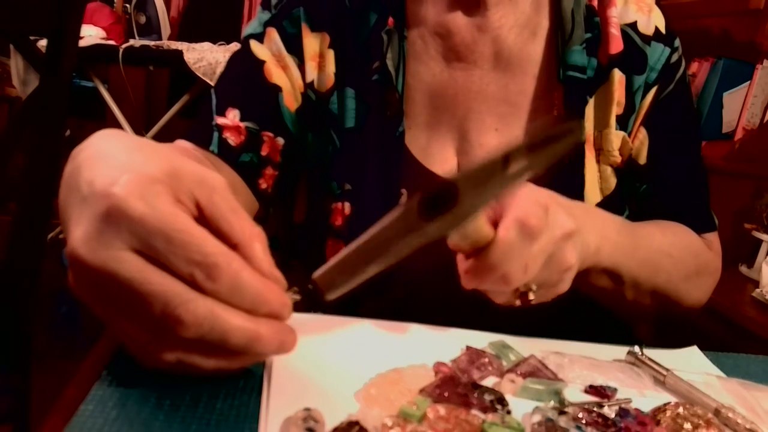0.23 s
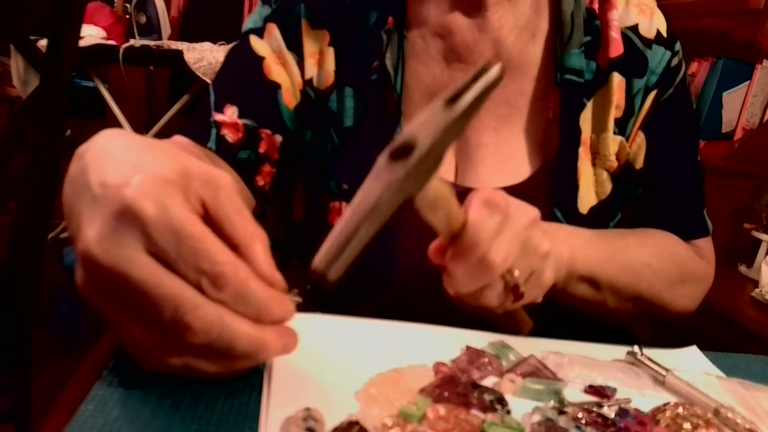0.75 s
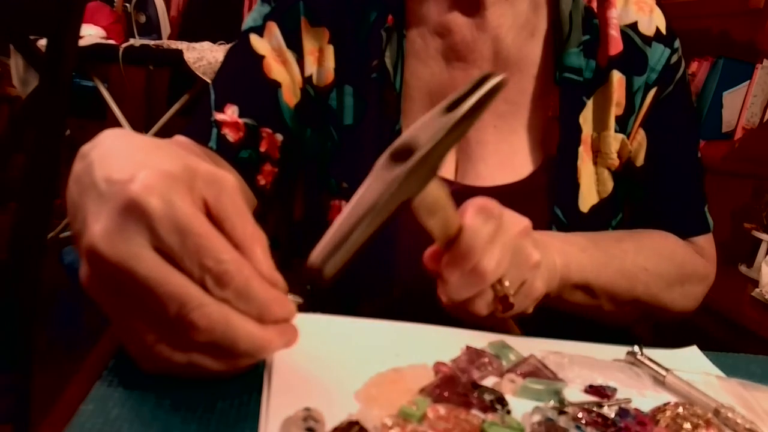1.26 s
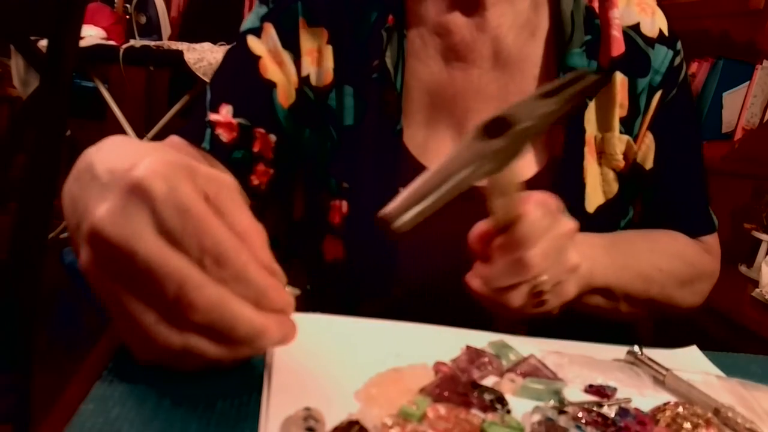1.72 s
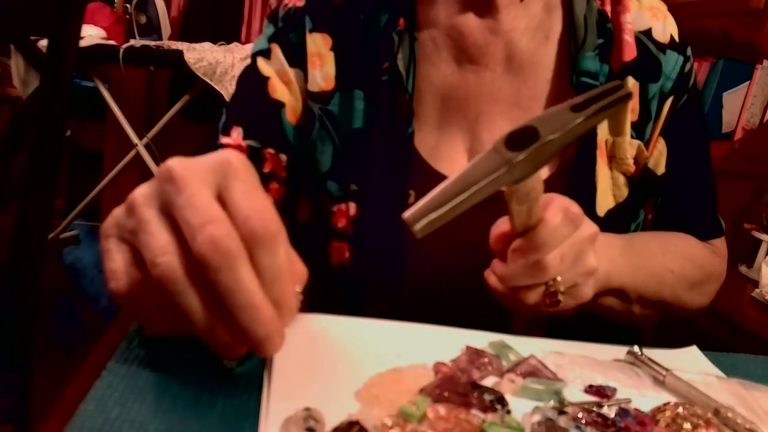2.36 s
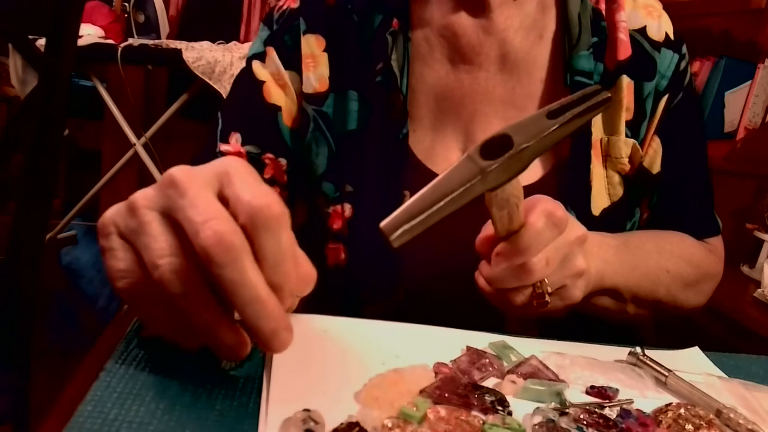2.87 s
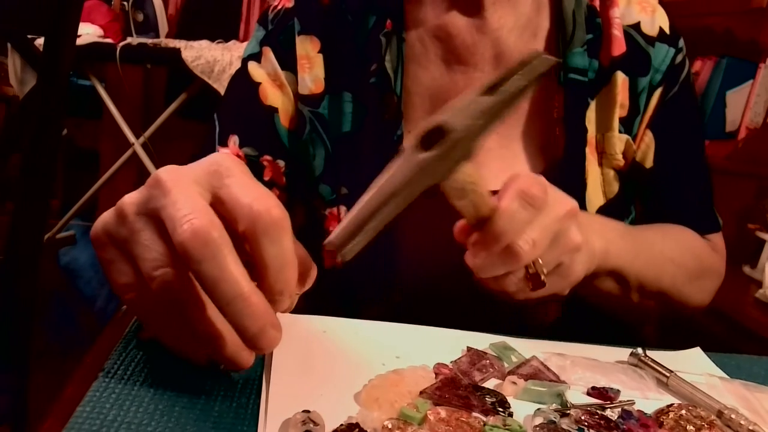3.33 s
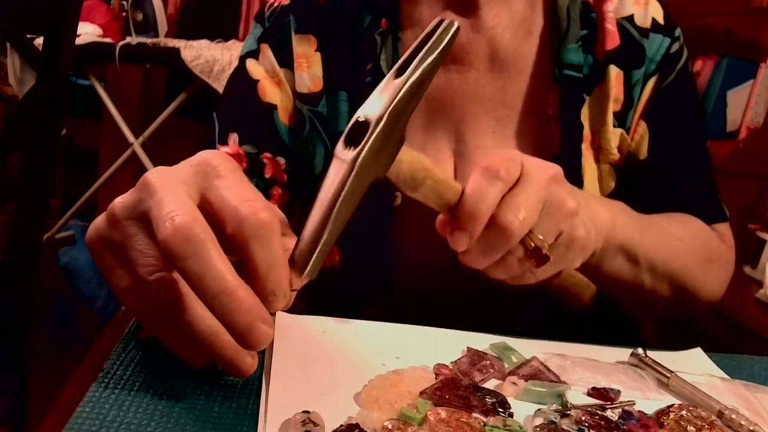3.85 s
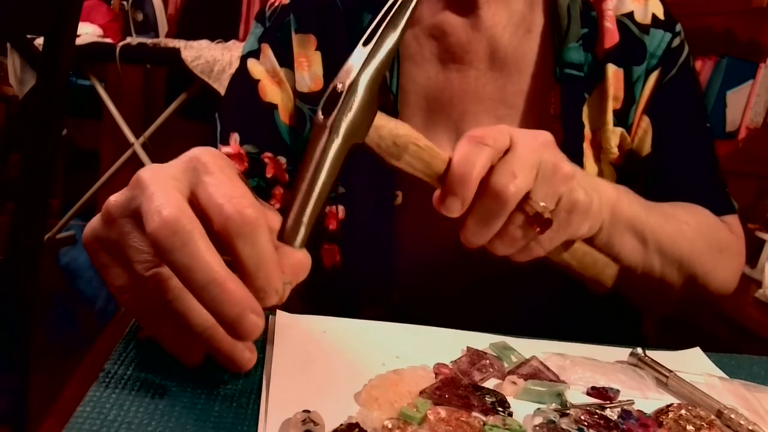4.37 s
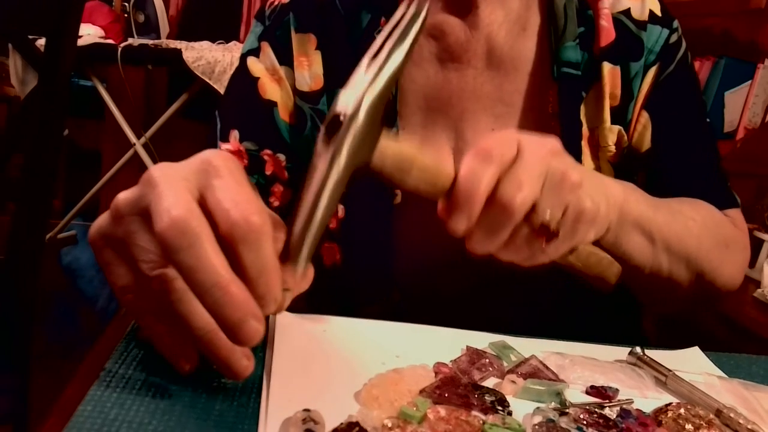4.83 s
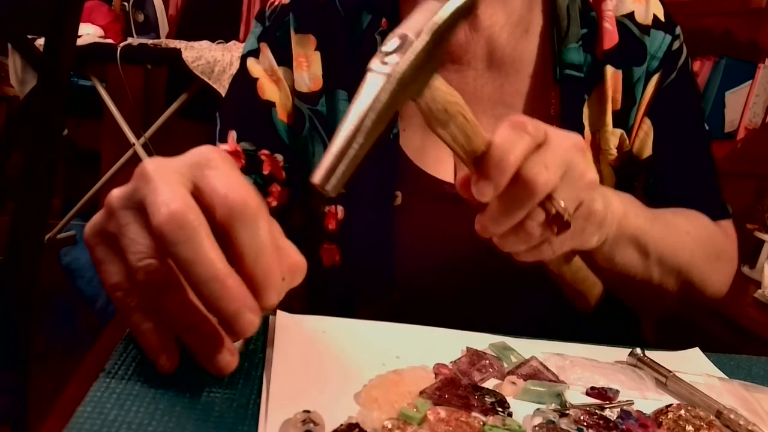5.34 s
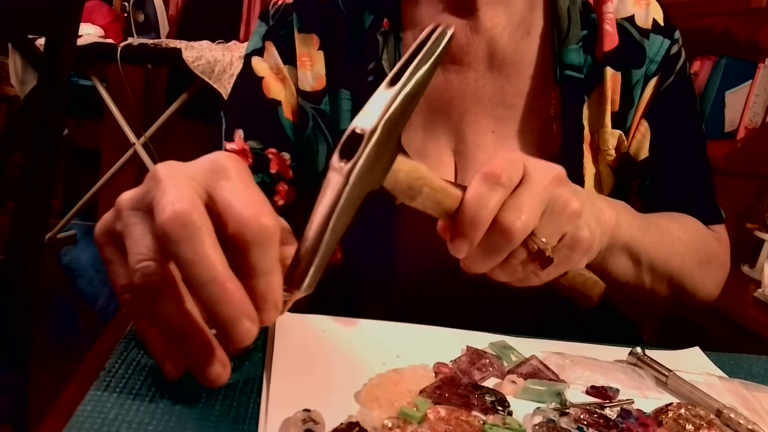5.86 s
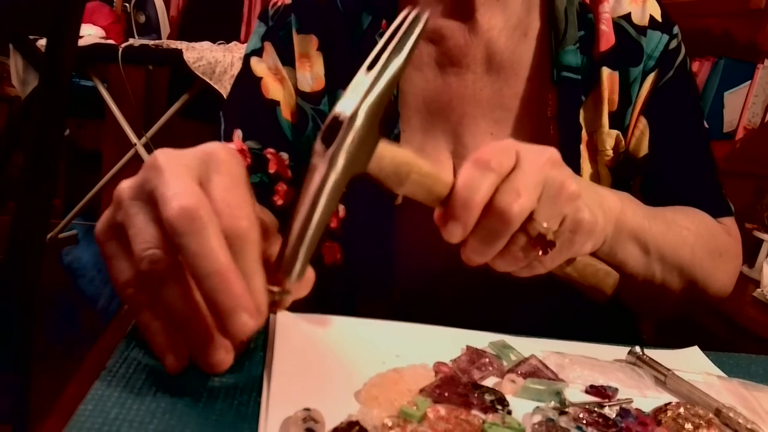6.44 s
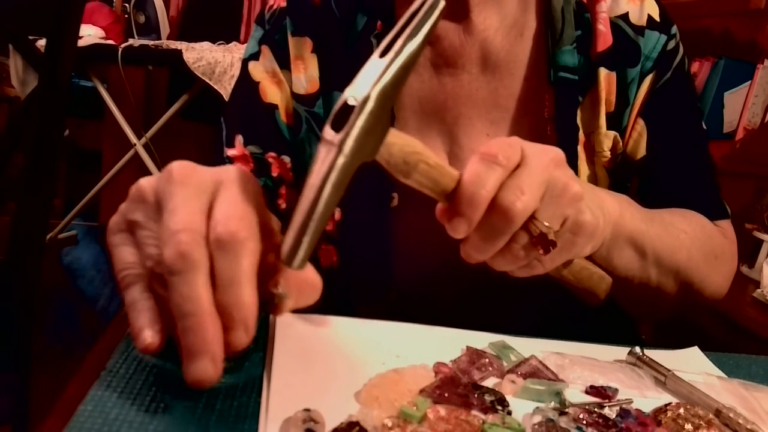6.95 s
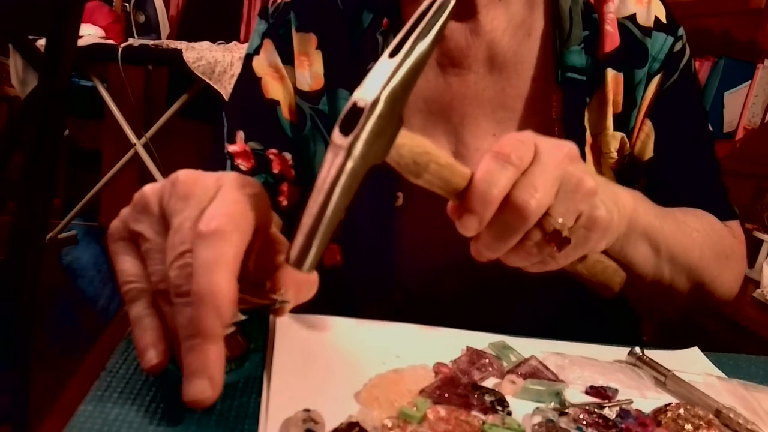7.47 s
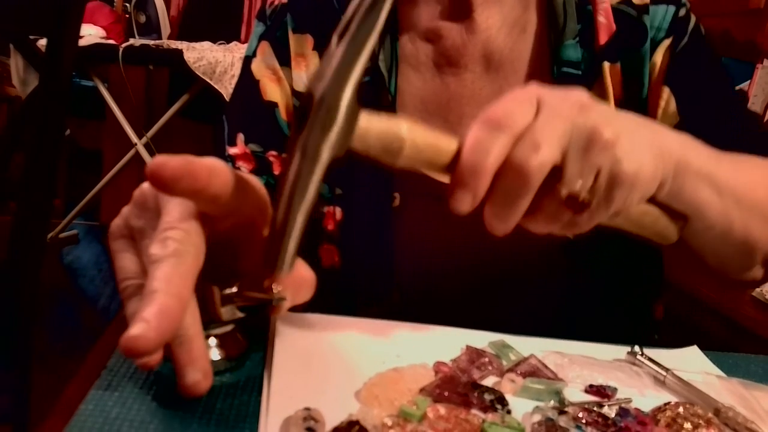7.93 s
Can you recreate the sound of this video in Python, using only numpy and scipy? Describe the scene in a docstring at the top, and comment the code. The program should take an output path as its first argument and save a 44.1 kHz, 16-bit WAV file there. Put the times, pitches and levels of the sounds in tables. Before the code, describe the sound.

Two sharp metallic blows, a pause, two more with deeper wooden knocks, light taps around them, over soft room noise and faint electronic whine.

```python
"""A jeweller's hammer strikes wire on a small steel anvil: two pairs of hard blows among light aiming taps.
Force, hardness, angle and rebound set how the steel cracks and rings and how the worktable knocks.
Fingers shift the wire as shaped noise; a small room answers hammer and fingers with a diffuse tail.
Beneath lie room noise, fan tones, the pulsing whine of a camera's electronics and faint focus-motor ticks.
The hard blows overload the microphone."""
import sys
import numpy as np
from scipy import signal
from scipy.fft import rfft, irfft, next_fast_len
from scipy.io import wavfile
from scipy.ndimage import uniform_filter1d

SR = 44100
rng = np.random.default_rng(int(sys.argv[2]) if len(sys.argv) > 2 else 0)


def generate_wav(sig):
    """Save sig (samples, or channels by samples) to the path in sys.argv[1] as 16-bit PCM at SR."""
    pcm = np.round(np.clip(np.atleast_2d(sig).T, -1, 1) * 32767).astype(np.int16)
    wavfile.write(sys.argv[1], SR, pcm)


N = 361619


def amp(db):
    """Decibels to gain."""
    return 10 ** (np.asarray(db) / 20)


def unit(x):
    """Scale to rms 1."""
    return x / np.sqrt(np.mean(x ** 2) + 1e-20)


def along(points, hz):
    """Read (frequency [Hz], value) points on a log frequency axis."""
    f, v = np.transpose(points)
    return np.interp(np.log(hz + 1), np.log(f + 1), v)


def filtered(x, response):
    """Shape x with a gain that is a function of frequency."""
    padded = next_fast_len(len(x) + 8192)
    spectrum = rfft(x, padded) * response(np.fft.rfftfreq(padded, 1 / SR))
    return irfft(spectrum, padded)[:len(x)]


def noise(spectrum, size):
    """Coloured noise of rms 1."""
    white = rng.standard_normal(size)
    return unit(filtered(white, lambda hz: amp(along(spectrum, hz))))


def burst(spectrum, envelope):
    """Coloured noise that carries exactly the energy of its envelope."""
    shaped = noise(spectrum, len(envelope)) * envelope
    return unit(shaped) * np.sqrt(np.mean(envelope ** 2))


def mode(t, hz, t60):
    """One dying vibration: a sine at a random phase that falls 60 dB in t60 seconds."""
    return amp(-60 * t / t60) * np.sin(2 * np.pi * (hz * t + rng.random()))


def add(track, s, sound):
    """Mix a sound into the track from time s."""
    part = track[max(round(s * SR), 0):][:len(sound)]
    part += sound[:len(part)]


# colour of the room noise: (frequency [Hz], relative level [dB per Hz])
AIR = [(20, -33.5), (50, -12.5), (130, -12.5), (230, -5.5), (480, -4.5), (670, -4), (880, -5), (1170, -2.5),
       (1500, -7.5), (2100, -9.5), (2900, -9.5), (3800, -13.5), (4700, -10.5), (5700, -13), (7200, -20),
       (15500, -24)]
# fan tones: (frequency [Hz], rms level [dB])
HUM = [(489.9, -77), (667.5, -74), (1733, -77.5)]


def background():
    """Steady room noise with the weak tones of a fan, each wandering in phase."""
    t = np.arange(N) / SR
    tones = np.zeros(N)
    for hz, db in HUM:
        drift = np.cumsum(rng.standard_normal(N)) * np.sqrt(6 / SR)
        tones += amp(db) * np.sqrt(2) * np.sin(2 * np.pi * hz * t + drift)
    return amp(-59) * noise(AIR, N) + tones


# tones of the camera's electronics: (frequency [Hz], peak level [dB])
WHINE = [(4982, -63), (8000, -77)]


def whine(on_time=0.027):
    """The camera whines once a frame for on_time seconds; its frame rate steps up from 15 to 20 a second."""
    t = np.arange(N) / SR
    step_up = 4 / 3  # s
    since_frame = np.where(t < step_up, t % (1 / 15), (t - step_up) % (1 / 20))
    gate = uniform_filter1d((since_frame < on_time) * 1., size=130)  # soft edges of about 3 ms
    return gate * sum(amp(db) * np.sin(2 * np.pi * hz * t) for hz, db in WHINE)


# how long the room rings: (frequency [Hz], t60 [s])
ROOM_T60 = [(100, 0.59), (300, 0.23), (1200, 0.28), (4000, .29), (9000, 0.22)]
# how strongly the room answers: (frequency [Hz], level [dB])
ROOM_DB = [(120, -7.5), (240, -10.5), (400, -6.5), (1200, -10), (2200, -10.5), (2900, -15), (3600, -13.5),
           (4090, -18.5), (4700, -14), (8400, -16.5), (14000, -22.5)]


def room(x):
    """The room's answer: a diffuse noise tail, each frequency dying at its own speed."""
    hz, t, grains = signal.stft(rng.standard_normal(SR * 3 // 5), SR, nperseg=256)
    t60 = along(ROOM_T60, hz)[:, None]
    even_energy = np.sqrt(np.log(1e6) / (t60 * SR))  # long and short decays carry equal energy
    gain = amp(along(ROOM_DB, hz))[:, None] * even_energy
    tail = signal.istft(grains * gain * amp(-60 * t / t60), SR, nperseg=256)[1]
    build_up = np.clip(np.arange(len(tail)) / SR / 0.013, 0, 1) ** 2
    return signal.fftconvolve(x, tail * build_up)[:len(x)]


def touches(rows, skirt_db):
    """Small contacts: a swell of noise around one pitch, skirt_db lower an octave below."""
    out = np.zeros(N)
    for s, db, hz, length in rows:
        band = [(hz / 8, 2 * skirt_db), (hz / 2, skirt_db), (hz, 0), (hz * 1.13, -3), (hz * 2, 2 * skirt_db)]
        swell = np.hanning(max(round(length * SR), 16))
        add(out, s, amp(db) * burst(band, swell))
    return out


# small clicks of the wire between the fingers: (time [s], level [dB], pitch [Hz], length [s])
TICKS = [(.026, -56, 5400, 0.026), (1.7122, -47.5, 4730, 0.0082), (5.253, -56, 4400, 0.0063),
         (5.338, -49, 7800, 0.0034), (5.944, -51, 6600, 0.005), (6.619, -50, 4950, 0.0048),
         (7.916, -53, 4420, .005), (8.0095, -45, 5600, 0.0035)]
# fingers sliding on wire and handle: (time [s], level [dB], pitch [Hz], length [s])
RUBS = [(.06, -59, 4300, 0.074), (2.25, -69, 5430, .3), (3.06, -61, 4600, 0.084), (3.76, -65.5, 5260, 0.53),
        (6.61, -62, 4980, 0.06), (6.88, -62, 4960, 0.37), (8.07, -63.5, 4670, 0.137),
        (8.155, -59, 2430, 0.037), (8.155, -60.5, 500, 0.054)]


def fingers():
    """The holding hand shifts the wire: clicks and rubs of pitched noise, with the room's answer."""
    handling = touches(TICKS, skirt_db=-16.5) + touches(RUBS, skirt_db=-13.5)
    return handling + room(handling)


# runs of faint ticks, likely the lens focusing: (first time [s], last time [s], level [dB])
FOCUS = [(.228, .27, -65.5), (.49, .53, -70), (2.66, 3.21, -66), (3.265, 3.3, -62), (3.36, 3.51, -66),
         (4.411, 4.45, -63.5), (6.158, 6.3, -64), (7.81, 8.16, -65.5)]
# resonances of the lens drive: (frequency [Hz], relative level [dB])
LENS = [(3000, 3), (4600, 2.5)]


def lens(step=.1, length=.018):
    """The focus motor nudges the lens at a steady pace; each nudge buzzes in two narrow resonances."""
    out = np.zeros(N)
    swell = np.hanning(round(length * SR))
    for first, last, db in FOCUS:
        for s in np.arange(first, last, step):
            for hz, level in LENS:
                band = [(hz * .8, -40), (hz * .96, 0), (hz * 1.04, 0), (hz * 1.2, -40)]
                uneven_db = 2 * rng.normal()
                add(out, s, amp(db + level + uneven_db) * burst(band, swell))
    return out


# wooden modes of the table under the anvil: (frequency [Hz], relative level [dB], t60 [s])
TABLE = [(76, -12.5, .2), (126, -4.5, 0.15), (210.7, -3, 0.16), (254.4, -1.5, 0.11), (335.4, -4.5, 0.17),
         (391.6, 2, 0.092), (450, -3, 0.046), (647, -10.5, 0.12), (697.5, -7, 0.094), (910, -5.5, 0.045),
         (981, -2.5, 0.06), (1107, -11.5, 0.14), (1249, -5, 0.063), (1364, -7.5, 0.1), (1560, -3, 0.044),
         (1704, -1.5, 0.055)]
# colour of the table's low rumble: (frequency [Hz], relative level [dB per Hz])
BOOM = [(25, -29.5), (60, -27), (120, -2.5), (165, -24), (210, -11.5), (300, 1), (500, -4), (1000, -48.5)]
# colour of the table's dull rattle: (frequency [Hz], relative level [dB per Hz])
KNOCK = [(250, -23.5), (400, -5), (540, -12), (680, 5.5), (1000, 1), (1650, -3), (1950, -6.5), (3000, -5),
         (7000, -38.5), (12000, -64)]


def table(t, boom_db, thud_db, knock_db, scatter_db=1.52, cutoff_hz=95):
    """The anvil jolts the table: wooden modes, a low boom and a dense, dull rattle."""
    deep_db = 0.72 * boom_db - 9.5  # a light tap is a soft push, so it favours the deepest mode
    # drive of the modes: (frequency [Hz], level [dB])
    force = [(130, deep_db), (200, boom_db), (260, boom_db), (330, thud_db), (450, thud_db), (630, knock_db)]
    modes = np.zeros(len(t))
    for hz, db, t60 in TABLE:
        mode_db = along(force, hz) + db + scatter_db * rng.normal()
        modes += amp(mode_db) * mode(t, hz, t60)
    boom = amp(boom_db - 4.0) * burst(BOOM, amp(-60 * t / 0.13))
    knock = amp(knock_db - 2.5) * burst(KNOCK, amp(-60 * t / 0.073))
    wood = (amp(-4.0) * modes + boom + knock) * (1 - np.exp(-t / 0.00084))
    # the board is too small to radiate deep bass
    return signal.sosfilt(signal.butter(2, cutoff_hz, "highpass", fs=SR, output="sos"), wood)


# short modes of hammer head and anvil: (frequency [Hz], level against the crack [dB], t60 [s])
STEEL = [(2455, -22.5, 0.0503), (2785, -11.5, 0.045), (2983, 1, 0.016), (4117, -1, 0.0057),
         (4600, -2, .008), (5180, -17, 0.025), (9410, -34, .05)]
# colour of the steel's crack: (frequency [Hz], relative level [dB per Hz])
CRACK = [(500, -26), (1900, -11), (2400, -3), (2950, 3), (3450, -14), (4000, 2), (4700, 0), (5500, -16),
         (7000, -33), (9000, -32), (15000, -63.5)]
# two strong, damped steel modes: (frequency [Hz], t60 [s])
PING, OVERTONE = (4088, 0.054), (8374, 0.039)


def steel(t, crack_db, ping_db, overtone_db, give=0.0015):
    """The wire yields for about a millisecond, then steel meets steel with a crack and a damped ping."""
    u = t / give
    crack = amp(-1.5) * burst(CRACK, (u * np.exp(1 - u)) ** 2)
    short = sum(amp(db) * mode(t, hz, t60) for hz, db, t60 in STEEL)
    ping = amp(ping_db) * mode(t, *PING) + amp(overtone_db) * mode(t, *OVERTONE)
    onset = 1 - np.exp(-u ** 2)
    return amp(crack_db) * crack + (amp(crack_db) * short + ping) * onset


# colour of wire buzzing on steel: (frequency [Hz], relative level [dB per Hz])
CHATTER = [(1200, -26.5), (2200, -2), (3600, -7), (4700, 5.5), (5400, 1.5), (6300, -6), (7500, -24.5),
           (12000, -42)]


def chatter(t, crack_db, length=0.072):
    """The wire buzzes against the anvil; a hard blow pins it, so the buzz stands out in light taps."""
    buzz_db = 0.47 * crack_db - 24.5
    envelope = amp(-60 * t / length) * (1 - np.exp(-t / .0005))
    return amp(buzz_db) * burst(CHATTER, envelope)


def answer_db(law, drive_db):
    """Level of a part that grows at its own rate with the drive."""
    full_db, growth = law
    return full_db + growth * drive_db


# how each part answers a contact: (level at 0 dB drive [dB], growth [dB per dB of drive])
BOOM_LAW, THUD_LAW = (-15.5, 0.6), (-15, .79)  # the table, driven by the force
PING_LAW, RING_LAW = (-2, 0.77), (-49.5, .48)  # the steel, driven by force plus hardness
OVERTONE_DB = -23.5  # under the ping when the head lands at a shallow angle
STEEP_OVERTONE_DB, STEEP_THUD_DB = 21.5, 11  # dB gained when it lands upright
REBOUND_BOOM = 0.18  # dB of boom per dB of rebound: a head that stays down damps the table too


def contact(t, force_db, crack_db, steepness, rebound_db):
    """Force jolts the table and the crack excites the steel; an upright head adds thud and overtone."""
    boom_db = answer_db(BOOM_LAW, force_db) + REBOUND_BOOM * rebound_db
    thud_db = answer_db(THUD_LAW, force_db) + STEEP_THUD_DB * steepness
    ping_db = answer_db(PING_LAW, crack_db)
    overtone_db = ping_db + OVERTONE_DB + STEEP_OVERTONE_DB * steepness
    wood = table(t, boom_db, thud_db, force_db)
    return wood + steel(t, crack_db, ping_db, overtone_db) + chatter(t, crack_db)


# the hammer head's barely damped mode: (frequency [Hz], t60 [s])
RING = (6202.5, 1)


def long_ring(t, ring_db, swell_db=5.0, swell_width=0.057):
    """The head sings on in one mode, swelling as it rebounds and turns past the microphone."""
    hz, t60 = RING
    rebound = 0.189 * amp((ring_db + 35.5) / 3)  # s; a stronger ring swells later: the head flies further
    swell = swell_db * np.exp(-((t - rebound) / swell_width) ** 2)
    return amp(ring_db + swell) * mode(t, hz, t60) * (1 - np.exp(-t / 0.0018))


# hammer contacts: (time [s], force [dB], hardness [dB], steepness of the head [0-1], rebound [dB])
# hardness: + lands on steel, - is cushioned; rebound: + springs free, - stays pressed down
BLOWS = [(.660, -67, 0, .2, -2), (.680, -73, 6, 0, -5.5), (.916, -61.5, 4.5, 0.48, 4),
         (1.1704, -23, 15, 0.04, -0.5), (1.4499, -16.5, 9.5, 0, -1), (4.2436, -48, -4, 0.7, 1.5),
         (4.320, -57.5, -24, 1, -28), (4.4904, -44.5, -1, .8, 4.5), (4.530, -65.5, -1.5, 0.12, -7.5),
         (4.7657, -18.5, 3.5, 0.96, -18), (5.0313, -12.5, 8.5, .6, 17), (5.918, -57, -10, 0.16, 3),
         (6.208, -62.5, -4, 0.54, -5), (6.414, -51.5, -13, 1, -6), (6.431, -68.5, 4, 1, -3)]


def hammer():
    """Each contact sounds steel, wire and table, and the room answers; a free rebound lets the head sing on."""
    out, t = np.zeros(N), np.arange(SR) / SR
    for s, force_db, hardness_db, steepness, rebound_db in BLOWS:
        crack_db = force_db + hardness_db
        blow = contact(t, force_db, crack_db, np.clip(steepness, 0, 1), rebound_db)
        ring = long_ring(t, answer_db(RING_LAW, crack_db) + rebound_db)
        add(out, s, blow + room(blow) + ring)
    return out


def scene():
    """Everything at the one microphone."""
    return (background() + whine() + fingers() + lens() + hammer())[None]


OVERLOAD, KNEE = 0.71, 11  # where the microphone saturates (full scale 1), and how abruptly
TOP_HZ = 15900  # band limit


def record(dry):
    """Hard blows saturate the microphone, which spits a little treble; all above the band limit is cut."""
    clipped = dry / (1 + np.abs(dry / OVERLOAD) ** KNEE) ** (1 / KNEE)
    return np.array([filtered(x, lambda hz: hz < TOP_HZ) for x in clipped])


dry = scene()
out = record(dry)
generate_wav(out)
```